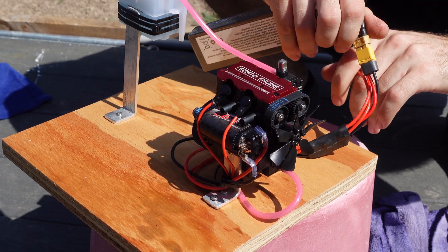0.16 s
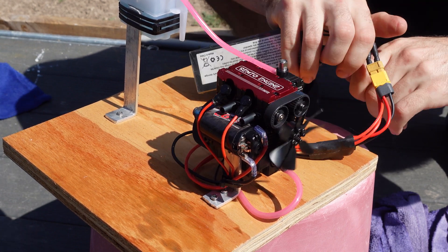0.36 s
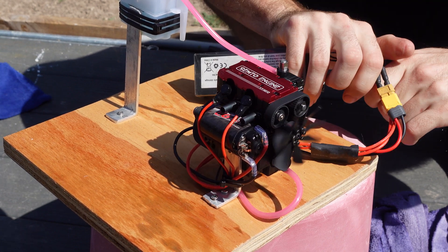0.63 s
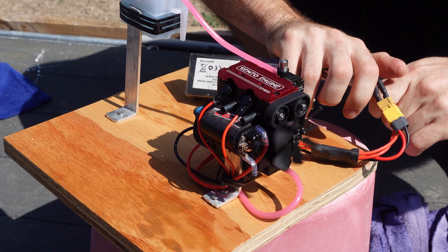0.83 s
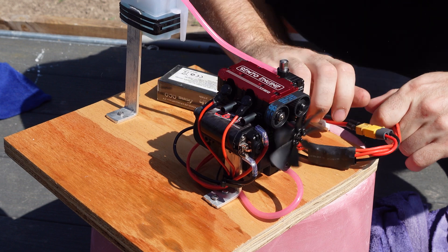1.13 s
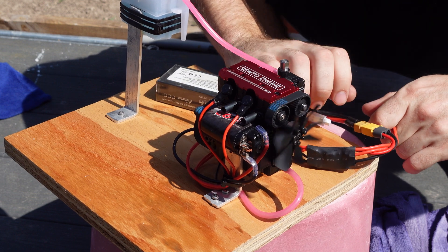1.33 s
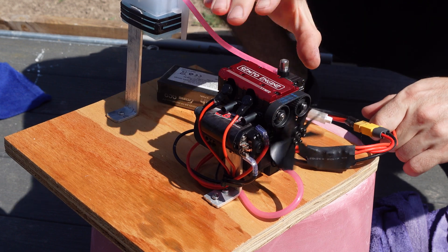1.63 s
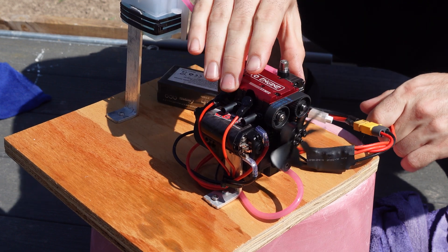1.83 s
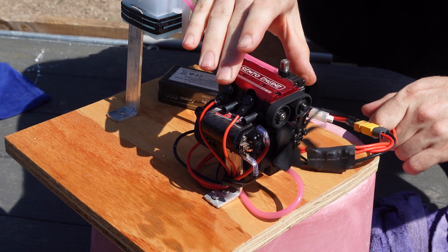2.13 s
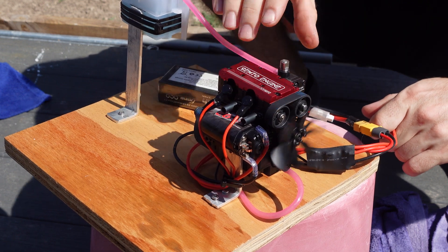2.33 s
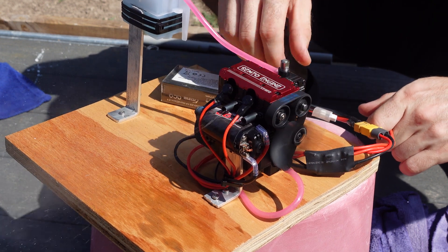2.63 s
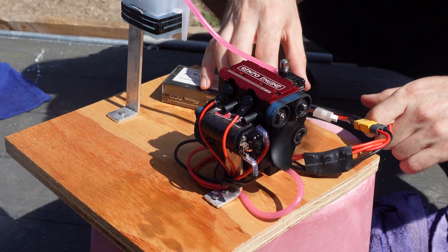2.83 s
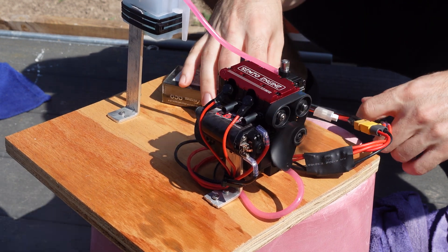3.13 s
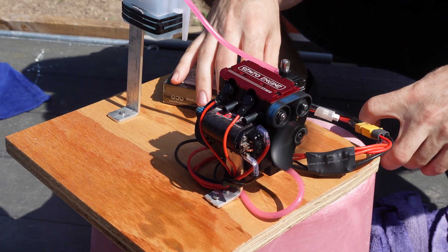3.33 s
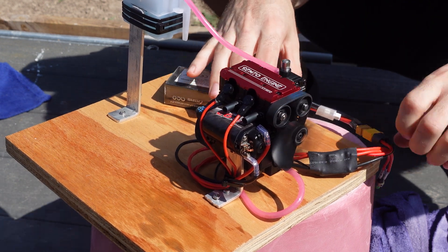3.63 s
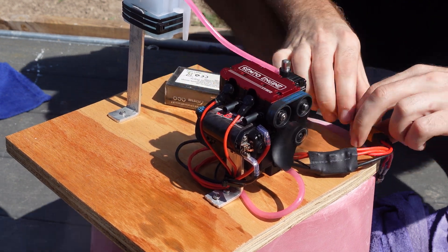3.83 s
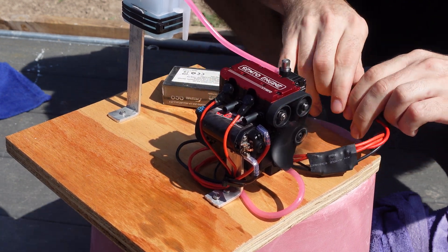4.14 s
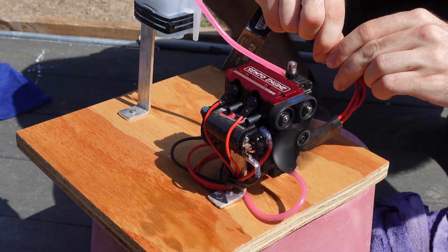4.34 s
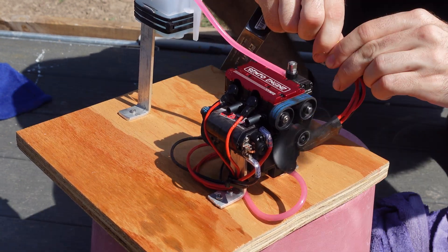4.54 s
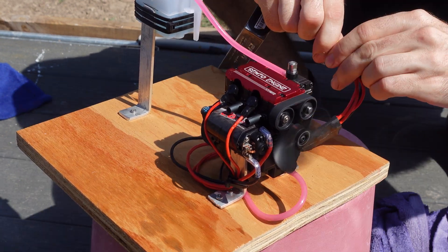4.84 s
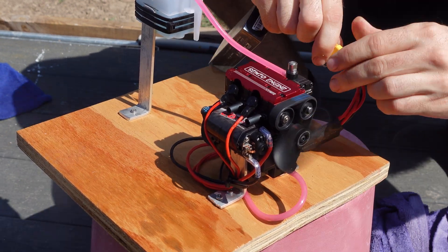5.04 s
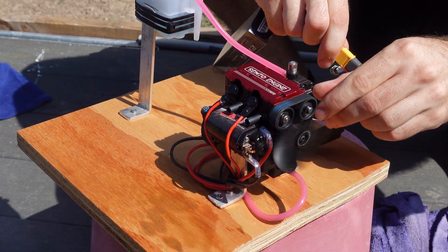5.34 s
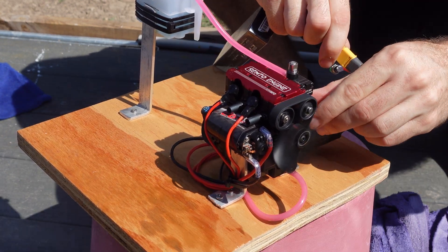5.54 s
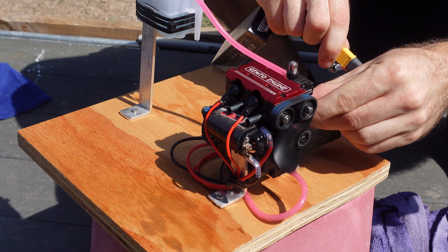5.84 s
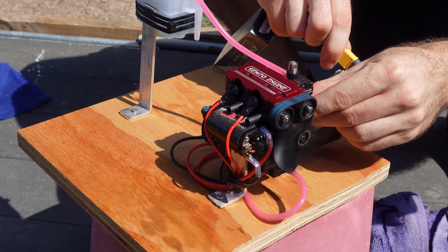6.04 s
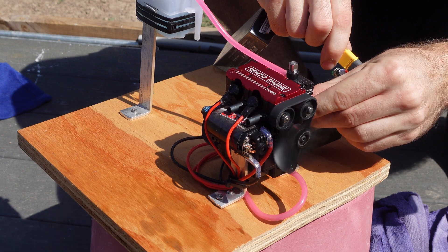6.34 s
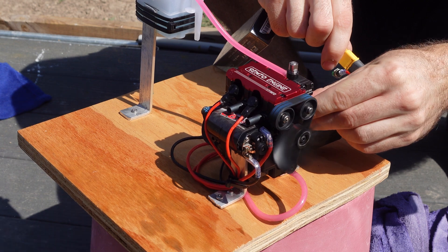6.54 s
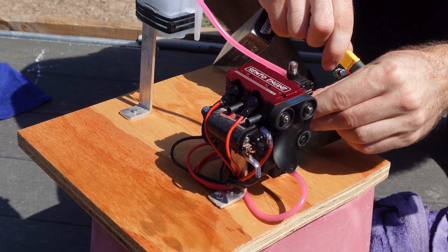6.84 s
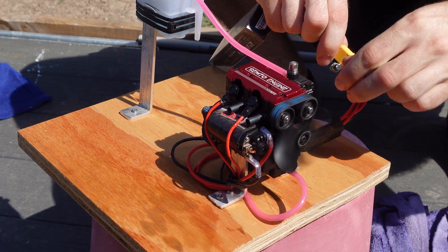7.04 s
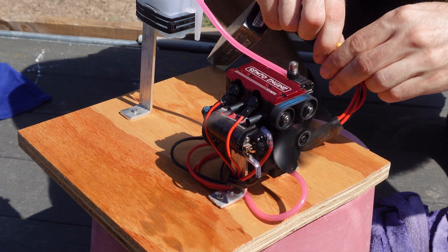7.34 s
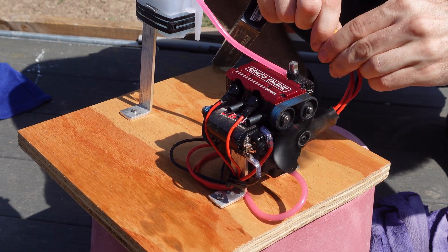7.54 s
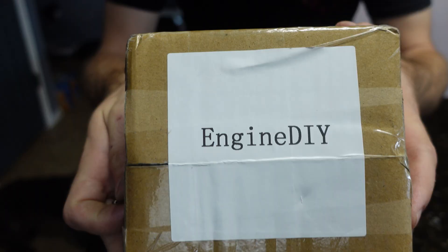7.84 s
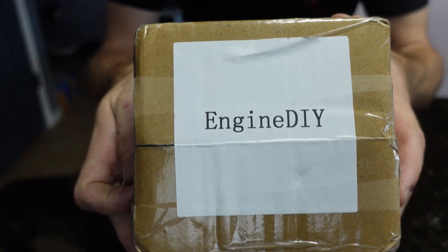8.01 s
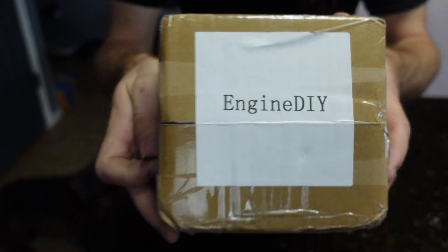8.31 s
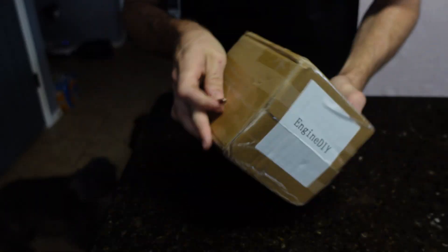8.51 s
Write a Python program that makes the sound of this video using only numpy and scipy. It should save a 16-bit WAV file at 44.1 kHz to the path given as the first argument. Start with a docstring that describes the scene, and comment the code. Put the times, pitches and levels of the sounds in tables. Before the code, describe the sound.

Outdoors, close up, an electric starter gives a short screech at about 0.4 seconds and cranks a small two-cylinder model engine. Its rapid, even clacking comes with a belt rasp, a gear whirr and the shudder of a plywood board. From 1.9 seconds the engine coughs and spits, and the starter slips with a second screech at 2.3. At 2.5 seconds the engine catches and runs loudly and raggedly, a buzz of fast exhaust pops with metallic valve clatter, hiss and a thin, very high whine that sinks in pitch. Around 6.3 seconds it speeds up to a higher, more even note as the whine fades. At 7.9 seconds the sound cuts abruptly to a quiet room. Between 8.3 and 8.7 seconds, fingers softly tap a hollow cardboard box three times and slide briefly over its faintly crackling tape.

```python
"""Outdoors, close up: an electric starter screeches and cranks a two-cylinder four-stroke model engine,
each compression shaking its plywood board. The engine coughs, the starter slips with a second screech,
and at 2.5 s it catches: exhaust pops, valve clatter and a thin sinking whine. It runs raggedly on both
cylinders, then from 6.3 s evenly and faster, mostly on one. At 7.9 s the scene cuts to a quiet room
where fingers tap a hollow cardboard box and slide over its crackling tape."""
import sys
import numpy as np
from scipy import signal
from scipy.fft import rfft, irfft, next_fast_len
from scipy.io import wavfile
from scipy.ndimage import uniform_filter1d, minimum_filter1d, map_coordinates

SR = 44100
rng = np.random.default_rng(int(sys.argv[2]) if len(sys.argv) > 2 else 0)


def int16_out(signal):
    """Quantize to a 16-bit WAV file."""
    q = np.round(np.clip(np.atleast_2d(signal).T, -1, 1) * 32767)
    wavfile.write(sys.argv[1], SR, q.astype(np.int16))


N = 382347
T = np.arange(N) / SR
SIZE = next_fast_len(N + SR // 2, True)
HZ = np.fft.rfftfreq(SIZE, 1 / SR)
START_S, CATCH_S, CUT_S = 0.32, 2.53, 7.897  # cues: starter on, engine catches, cut to the room
IDLE_HZ, REV_HZ = 58.5, 69.4  # cycle rates: ragged idle, fully revved tone

# engine speed in four-stroke cycles a second: t/s, f/Hz
CYCLE_RATE = [(2.55, 47.86), (2.68, 54.72), (2.8, 58.2), (2.86, 58.62), (3.28, 56.22), (3.46, 53.73),
              (3.52, 56.06), (3.72, 59.78), (4.42, 60.44), (4.54, 57.88), (4.69, 56.76), (4.75, 59.24),
              (5.09, 60.16), (5.29, 58.9), (5.38, 56), (5.55, 59.43), (6.01, 59.4), (6.12, 61.7),
              (6.16, 60.17), (6.31, 73.5), (6.42, 75.53), (6.61, 72.15), (6.8, 76.4), (7.07, 72.74),
              (7.73, 78.54), (7.89, 76.4)]
# faders of the running engine: t/s, exhaust level/dB, ping and valve level/dB, hiss level/dB
ENGINE_FADERS = [(2.6, -10, -29, -28.5), (2.61, -11.5, -26, -27.5), (3.38, -15, -27.5, -32.5),
                 (3.92, -12, -21.5, -29), (4.41, -13.5, -23.5, -31), (6.94, -14.5, -24, -31.5),
                 (7.01, -15.5, -27, -33), (7.81, -12.5, -25.5, -30), (7.88, -16, -29.5, -31.5)]
# combustion: t/s, second cylinder's strength/0-1, raggedness
COMBUSTION = [(2.5, 0.27, 5.5), (3.0, 0.66, 7), (4.5, 0.64, 4), (6.2, 0.23, 7), (6.32, 0.17, 2),
              (7.9, 0.13, 2)]
# EQ of an exhaust pop: f/Hz, level/dB
POP_EQ = [(35, -67), (75, -29.5), (125, -12.5), (175, 0), (230, -4.5), (300, 0), (370, -6), (445, 12),
          (530, 6), (620, 4.5), (730, 4), (860, -2), (1000, -3), (1300, -13), (1800, -28), (4000, -47.5)]
# extra EQ on the pops when revved: f/Hz, level/dB
REV_EQ = [(300, -0.5), (450, -3.5), (545, 3), (610, -2.5), (720, 4), (810, 1.5), (920, 8), (1150, -5.5),
          (2000, -9.5)]
# EQ of the rough exhaust gas: f/Hz, level/dB
GAS_EQ = [(40, -42), (110, -30.5), (190, -8.5), (250, 1), (340, -12.5), (445, 4), (560, -10.5), (700, 1),
          (830, -7), (1000, -6.5), (1700, -24.5), (4000, -42.5)]
# ring of the stand, rocked by the crank: f/Hz, width/Hz, level/dB
STAND_MODES = [(75, 20, -27), (179, 15.4, -10), (264.7, 17.45, 5.5), (283.6, 26.1, 6.5), (430, 31, -8),
               (666, 29, -7.5)]
# ring of the exhaust port: f/Hz, width/Hz, level/dB
PORT_MODES = [(2714, 410, -5), (3086, 285, 2.5), (3550, 440, -11)]
# ring of the metal under the valve gear: f/Hz, width/Hz, level/dB
METAL_MODES = [(1383, 33, 4.5), (2048, 82, 6.5), (2690, 130, 8.5), (3260, 236, 8), (4355, 145.9, 0.5),
               (5660, 570, -4)]
# EQ of hissing gas: f/Hz, level/dB
HISS_EQ = [(900, -9), (1700, -9), (3000, 3), (4300, 0.5), (5300, -5), (6600, -1.5), (8300, -5.5),
           (10000, -10), (13000, -13.5), (15800, -17.5)]
# the whine before its drop: t/s, f/Hz, level/dB
WHINE_GLIDE = [(0.6, 9800, -55), (2.5, 9630, -37), (2.65, 9050, -24), (2.83, 8704, -19.5), (3.1, 8420, -20),
               (3.42, 8348, -19), (3.8, 8075, -23.5), (4.24, 7886, -25)]
# first firings: t/s, level/dB, offset for spit and thud/dB
COUGH_CUES = [(1.911, -16, -20), (1.967, -6, -22), (2.014, -8, -24), (2.031, -4, -18.5), (2.077, -4, -32),
              (2.097, -7, -22), (2.143, -7.5, -26), (2.224, -9, -9.5), (2.357, -6, -11), (2.392, -3, -7),
              (2.444, 1, -5), (2.479, -7.5, -9), (2.536, -14, -2), (2.561, 3.5, -9)]
# cranking, briefly quicker as firings help: t/s, stroke rate/Hz, board level/dB, belt level/dB
CRANK_CURVES = [(0.45, 14.79, -12, -29.5), (1.2, 14.79, -11, -26.5), (1.7, 14.79, -11.5, -26),
                (1.87, 14.79, -15, -28.5), (1.92, 18.5, -19, -32.5), (2.22, 18.5, -16, -30.5),
                (2.36, 15, -10.5, -24.5), (2.65, 15, -10, -21.5)]
# ring of engine and board while cranking: f/Hz, width/Hz, level/dB
BOARD_MODES = [(215.6, 37, -8), (262, 32, -5), (337, 18.4, 1), (450, 28, -3.5), (706.5, 27.3, 3),
               (930, 40, -5), (1047, 59, -9)]
# EQ of the belt's rasp: f/Hz, level/dB
BELT_EQ = [(900, -16.5), (1200, -6), (1700, -17.5), (2150, -9.5), (2400, -5), (2850, -3), (3700, -6),
           (7300, -14), (8400, -14), (10500, -20.5), (15800, -26)]
# the belt pulley sings out: t/s, level/dB
PULLEY_SWELLS = [(0.47, -32.5), (1.21, -26), (1.35, -33), (1.55, -30), (1.75, -32), (2.301, -20.5),
                 (2.45, -23.5), (2.62, -22)]
# starter screeches: t/s, length/s, first f/Hz, held f/Hz, squeal attack/s,
# squeal level before EQ/dB, bite level/dB, grind level/dB, roughness/0-1
SCREECH_CUES = [(0.365, 0.075, 1415, 958, 0.0053, -18, -10, -25, 0.11),
                (2.251, 0.088, 1310, 1177, 0.037, -13.5, -6, -20.5, 0.01)]
# partials of the squeal: harmonic number, level/dB
SQUEAL_PARTIALS = [(1, 1), (2, 1), (3, 1.5), (4, 2.5), (5, -2.5), (6, -10.5), (7, -13), (8, -24)]
# the mount ringing along with the squeal: f/Hz, level/dB
MOUNT_EQ = [(600, 1), (950, 16), (1150, 2), (1400, -1.5)]
# EQ of the starter's grinding: f/Hz, level/dB
GRIND_EQ = [(350, -50), (600, -7), (1700, -5.5), (1970, -16), (2590, -9), (4310, -3.5), (5210, -11.5),
            (6060, -5), (15800, -19)]
# fader of the starter's gear whirr: t/s, level/dB
WHIRR_FADER = [(1.0, -57), (1.5, -35), (1.8, -41.5), (1.9, -28), (2.22, -30), (2.3, -49)]
# finger taps: t/s, knock level/dB, offset for crackle/dB
TAP_CUES = [(8.324, -32.5, -16), (8.481, -31, -24), (8.664, -30, -8)]
# hand slides: t/s, length/s, rub level/dB, tape level/dB
SLIDE_CUES = [(8.466, 0.062, -41.5, -38), (8.648, 0.05, -37, -39)]
# EQ of the hollow box: f/Hz, level/dB
BOX_EQ = [(41, -44.5), (70, -17), (112, -7), (469, -3), (623, -6), (1190, -2.5), (1300, -10), (1500, -10.5),
          (3000, -29), (3900, -49), (6600, -120)]
# EQ of the crackling tape: f/Hz, level/dB
TAPE_EQ = [(1290, -59.5), (2200, -41), (3610, -18), (4080, -18), (4440, -13.5), (4620, -18), (5780, -25),
           (7970, -25), (15800, -44.5)]
# EQ of the outdoor ambience: f/Hz, level/dB
YARD_EQ = [(15, -49), (25, -63.5), (137, -0.5), (170, -5.5), (382, -9.5), (437, -8.5), (881, -13.5),
           (1010, -10.5), (1980, -28), (8050, -33.5), (15800, -43.5)]
# EQ of the room tone: f/Hz, level/dB
ROOM_EQ = [(15, -51.5), (25, -30), (55, -20), (86, -8), (110, -11), (205, -0.5), (333, -5.5), (403, -2),
           (710, -6), (955, -7), (1360, -15.5), (8050, -35.5), (15800, -46)]


def engine(hunting=0.0011):
    """One cycle count clocks every engine layer; ragged firing makes the speed hunt."""
    speed, = curves(CYCLE_RATE)
    _, ragged = curves(COMBUSTION)
    cycle = np.cumsum(speed * (1 + hunting * ragged * wobble(25))) / SR
    times, sizes = firings(cycle)
    body = exhaust(cycle, times, sizes) * gate(2.3, CUT_S, rise=0.49)
    top = clatter(cycle, times, sizes) * gate(CATCH_S, CUT_S, rise=0.038)
    return body + top + whine(cycle)


def firings(cycle, lag_cycles=0.275, flip_chance=0.1):
    """Times and strengths of the firings, the second cylinder trailing the first."""
    second_strength, raggedness = curves(COMBUSTION)
    first, second = cycle_times(cycle, 0), cycle_times(cycle, lag_cycles)
    times = np.concatenate([first, second])
    sizes = np.concatenate([np.ones(len(first)), np.interp(second, T, second_strength)])
    ragged = np.interp(times, T, raggedness)
    # the limp: every other cycle burns weakly, and now and then the pattern flips
    weak = np.tile(np.cumsum(rng.random(len(first)) > flip_chance) % 2, 2)
    sizes *= amp(-1.58 * np.maximum(ragged - 1, 0) * weak)
    sizes *= amp(0.84 * ragged * np.minimum(rng.standard_normal(len(times)), 0.7))
    misfired = rng.random(len(times)) < 0.003 * ragged ** 2
    jitter_s = 4e-6 * ragged ** 2 * rng.standard_normal(len(times))
    return times + jitter_s, sizes * np.where(misfired, 0.25, 1)


def exhaust(cycle, times, sizes, pop_db=-1.5, gas_db=-14, stand_db=-6.5):
    """Firings pop from the pipe over a rush of gas; the crank rocks the stand in strict time."""
    revved = np.clip((curves(CYCLE_RATE)[0] - IDLE_HZ) / (REV_HZ - IDLE_HZ), 0, 1)
    intakes = cycle_times(cycle, 0.475)
    puffs = pulses(times, sizes) + pulses(intakes, np.full(len(intakes), 0.3))
    puffs = puffs * (1 - revved) + filtered(puffs * revved, eq(REV_EQ))
    pops = -steady(filtered(puffs, eq(POP_EQ)), 0.087)
    gas = noise(eq(GAS_EQ)) * (0.5 + 0.5 * curves(COMBUSTION)[1])  # louder when ragged
    beats = cycle_times(cycle, 0)
    shoves = pulses(beats, np.ones(len(beats)))
    rocking = -steady(filtered(shoves, resonances(STAND_MODES)), 0.101)
    fader = amp(curves(ENGINE_FADERS)[0])
    return fader * (amp(pop_db) * pops + amp(gas_db) * gas + amp(stand_db) * rocking)


def clatter(cycle, times, sizes, lead_s=0.00065):
    """Blow-down pings the port ahead of each pop, valves tap the metal, and gas hisses with both."""
    _, ring_db, hiss_db = curves(ENGINE_FADERS)
    speed, = curves(CYCLE_RATE)
    _, ragged = curves(COMBUSTION)

    def scatter(at):
        """Random gain per hit, wider when ragged."""
        return amp(0.5 * np.interp(at, T, ragged) * rng.standard_normal(len(at)))

    intakes = cycle_times(cycle, 0.5)
    suction = 0.41 * (np.interp(intakes, T, speed) / REV_HZ) ** 4  # the intake pings too, at speed
    puffs = pulses(times - lead_s, sizes * scatter(times))
    puffs += pulses(intakes - lead_s, suction * scatter(intakes))
    ping = steady(filtered(puffs, resonances(PORT_MODES)), 0.041)
    taps = np.concatenate([cycle_times(cycle, part) for part in (0.24, 0.44, 0.72, 0.95)])
    force = np.repeat([0.65, 0.8, 0.2332, 0.37], len(intakes)) * scatter(taps)
    metal = steady(filtered(pulses(taps, force), resonances(METAL_MODES)), 0.088)
    metal *= (speed / IDLE_HZ) ** 3.2  # valves hit harder with speed
    flow = 0.5 + 3.4 * bursts(taps, force, t60=0.017) + 0.66 * bursts(times - lead_s, sizes, t60=0.041)
    hiss = steady(noise(eq(HISS_EQ)) * flow, 0.14) * amp(5 + 0.61 * ragged)
    casing = noise(resonances([(8700, 70, -12), (9130, 120, 0)]))
    return amp(ring_db) * (amp(-1.8) * ping + amp(-7) * metal) + amp(hiss_db) * (hiss + amp(-5) * casing)


def whine(cycle, drop_s=4.257, flutter_hz=12):
    """A thin tone that glides down, drops a step, then sinks and fades as the engine speeds up."""
    over_idle = curves(CYCLE_RATE)[0] - IDLE_HZ
    dropped = [7410 - 16.8 * over_idle, -21.5 - 0.5 * over_idle]
    hz, db = np.where(T < drop_s, curves(WHINE_GLIDE), dropped)
    shake = 8 * np.pi * cycle  # twice per turn of the crank
    phase = 2 * np.pi * np.cumsum(hz + flutter_hz * wobble(160)) / SR + 0.32 * np.sin(shake)
    tone = np.sqrt(2) * np.sin(phase) * (1 + 0.16 * np.cos(shake))
    return tone * amp(db + wobble(60)) * gate(WHINE_GLIDE[0][0], CUT_S, rise=0.3)


def coughs():
    """Stray firings as the engine tries to catch: a pop, a thud into the board and a spit of gas."""
    times, db, offset_db = np.transpose(COUGH_CUES)
    pipe = eq(POP_EQ)
    pops = filtered(pulses(times, -amp(db - 1)), pipe) / np.abs(irfft(pipe, SIZE)).max()
    boom = steady(noise(resonances([(225, 51, 0)]) ** 2), 0.039)
    thud = boom * bursts(times, amp(db + offset_db - 1), t60=0.13)
    spit = noise(eq(HISS_EQ)) * bursts(times, amp(db + offset_db + 3), t60=0.029)
    return pops + thud + spit


def cranking(first_stroke_s=0.3376, spin_up_s=0.095, load_lag_s=0.0071, knocks_per_s=1100):
    """Each compression clacks, loads the belt and its singing pulley, and shudders through the board."""
    rate, board_db, belt_db = curves(CRANK_CURVES)
    count = np.cumsum(rate * (T > first_stroke_s)) / SR
    last_stroke = int(np.interp(CRANK_CURVES[-1][0], T, count))
    strokes = np.interp(np.arange(last_stroke + 1), count, T)
    load_sizes, clack_sizes = amp(1.1 * rng.standard_normal((len(strokes), 2))).T
    load = sum(size * swell(at + load_lag_s, 0.0145) for at, size in zip(strokes, load_sizes))
    pull = np.clip((T - START_S) / spin_up_s, 0.3, 1)
    slipping = gate(2.24, 2.335, rise=0.041, fall=0.0033)  # the shudder ducks as the starter slips
    knocks = rng.standard_normal(N) * (rng.random(N) < knocks_per_s / SR)
    wood = resonances(BOARD_MODES) * eq([(50, -3), (180, 1), (1100, -7), (1600, -7), (4000, -32.5)])
    shudder = amp(board_db - 7 * (1 - pull) - 12 * slipping) * np.hypot(load, amp(-7))
    board = steady(filtered(knocks, wood), 0.033) * shudder
    rasp = amp(1.5 + 3.5 * wobble(220)) * (0.68 + 0.15 * load)
    clack = amp(11) * bursts(strokes, clack_sizes, t60=0.016)
    belt = noise(eq(BELT_EQ)) * amp(belt_db) * np.hypot(rasp, clack)
    singing = amp(-36) * (rate.min() / rate) ** 3
    singing += sum(amp(db) * swell(at, 0.035) for at, db in PULLEY_SWELLS)
    ring = steady(noise(resonances([(8780, 25, -7), (8890, 38, -7)])), 0.061)
    pulley = ring * singing * (0.19 + 1.2 * load)
    return (board + (belt + pulley * pull) * pull) * gate(START_S, 2.715, fall=0.29)


def screech(cue, bite_s=0.012, grip_s=0.018, sag_hz_per_s=750):
    """The starter slips: a grinding bite, then a squeal that rings the mount and dives as it grips."""
    start, length, first_hz, held_hz, attack_s, squeal_db, bite_db, grind_db, rough = cue
    t = np.clip(T - start, 0, length)
    bite = np.exp(-(t / bite_s) ** 2)
    grip = np.clip(1 - (length - t) / grip_s, 0, 1)
    hz = (held_hz + (first_hz - held_hz) * bite - sag_hz_per_s * t) * (1 - 0.19 * grip)
    jitter = (rough + 0.1 * (bite + grip / 2)) * wobble(600)
    phase = 2 * np.pi * np.cumsum(hz * (1 + jitter)) / SR
    tone = unit(sum(amp(db) * np.sin(k * phase + rng.uniform(0, 2 * np.pi)) for k, db in SQUEAL_PARTIALS))
    squeal = filtered(tone, eq(MOUNT_EQ)) * amp(squeal_db) * np.minimum(t / attack_s, 1) * (1 - grip / 2)
    grinding = noise(eq(GRIND_EQ)) * np.hypot(amp(bite_db) * bite, amp(grind_db))
    return (squeal + grinding) * gate(start, start + length, fall=0.0057)


def whirr(throb_hz=48, depth=0.39):
    """The starter's gears whirr and throb as it spins more freely."""
    level_db, = curves(WHIRR_FADER)
    throb = 1 + depth * np.sin(2 * np.pi * throb_hz * T)
    ring = noise(resonances([(550, 63, -0.5), (2335, 52, 0.5), (2850, 530, -9)]))
    return ring * throb * amp(level_db) * gate(WHIRR_FADER[0][0], WHIRR_FADER[-1][0])


def box(attack_s=0.027, release_t60=0.49, handling_db=-49):
    """Fingers knock and rub the hollow box and slide over its crackling tape."""
    times, db, offset_db = np.transpose(TAP_CUES)
    hollow = bursts(times, amp(db - 2), t60=0.036) + amp(handling_db) * (T > SLIDE_CUES[0][0])
    crackle = bursts(times, amp(db + offset_db - 5), t60=0.027)
    for start, length, rub_db, tape_db in SLIDE_CUES:
        release = amp(-60 * np.maximum(T - start - length, 0) / release_t60)
        slide = np.clip((T - start) / attack_s, 0, 1) * release
        hollow += amp(rub_db) * slide
        crackle += amp(tape_db + 1.7 * wobble(770)) * slide
    return hollow * noise(eq(BOX_EQ)) + crackle * noise(eq(TAPE_EQ))


def ambience(yard_db=-50.5, room_db=-45):
    """A faint outdoor bed, hard cut to murky room tone."""
    return np.where(T < CUT_S, amp(yard_db) * noise(eq(YARD_EQ)), amp(room_db) * noise(eq(ROOM_EQ)))


def cycle_times(cycle, part):
    """When each engine cycle is this part of the way through."""
    return np.interp(np.arange(1, int(cycle[-1]) - 1) + part, cycle, T)


def amp(db):
    """Decibels to gain."""
    return 10 ** (np.asarray(db) / 20)


def unit(x):
    """Scale to rms 1."""
    return x / np.sqrt(np.mean(x ** 2) + 1e-20)


def steady(x, seconds):
    """Ride the gain to hold the running rms near 1."""
    width = max(int(seconds * SR), 2)
    power = np.abs(uniform_filter1d(uniform_filter1d(x ** 2, width), width))
    return x / np.sqrt(power + np.mean(x ** 2) / 10 ** 4)


def curves(rows):
    """An automation curve for each column after the time."""
    times, *columns = np.transpose(rows)
    return [np.interp(T, times, column) for column in columns]


def gate(t0, t1, rise=0.0024, fall=0.00119):
    """Fades in from t0 and is shut at t1; all in seconds."""
    return np.clip((T - t0) / rise, 0, 1) * np.clip((t1 - T) / fall, 0, 1)


def swell(at, half_width_s):
    """A bell-shaped envelope."""
    return np.exp(-0.5 * ((T - at) / half_width_s) ** 2)


def bursts(times, sizes, t60):
    """An envelope that jumps at each time and falls 60 dB in t60 seconds."""
    kicks = np.bincount(np.clip(np.asarray(times) * SR, 0, N).astype(int), sizes, N + 1)[:N]
    return signal.lfilter([1], [1, -amp(-60 / (t60 * SR))], kicks)


def wobble(rate):
    """Smooth random modulation, rate knots a second."""
    return map_coordinates(rng.standard_normal(int(N * rate / SR) + 4), [T * rate])


def eq(points):
    """Minimum-phase response through (Hz, dB) points."""
    hz, db = np.transpose(points)
    gain = amp(np.interp(np.log(HZ + 1), np.log(hz + 1), db))
    cepstrum = irfft(np.log(gain + 1e-6), SIZE)
    cepstrum[1:SIZE // 2] *= 2
    cepstrum[SIZE // 2 + 1:] = 0
    return np.exp(rfft(cepstrum))


def resonances(modes):
    """Response of a bank of (Hz, width, dB) resonators, alternating in polarity."""
    return sum((-1) ** k * amp(db) * 1j * HZ * width / (hz * hz - HZ ** 2 + 1j * HZ * width)
               for k, (hz, width, db) in enumerate(modes))


def filtered(x, response):
    """x through a frequency response."""
    return irfft(rfft(x, SIZE) * response, SIZE)[:N]


def noise(response):
    """Coloured noise of rms 1."""
    return unit(filtered(rng.standard_normal(N), response))


def pulses(times, sizes):
    """Clicks placed between samples as windowed sincs."""
    at = np.asarray(times)[:, None] * SR
    taps = np.floor(at) + np.arange(-7, 9)
    clicks = np.sinc(taps - at) * np.cos(np.pi * (taps - at) / 16) ** 2 * np.asarray(sizes)[:, None]
    return np.bincount(np.clip(taps, 0, N).astype(int).ravel(), clicks.ravel(), N + 1)[:N]


def scene():
    """Mono mix of starter, engine, box and ambience."""
    starter = cranking() + whirr() + sum(screech(cue) for cue in SCREECH_CUES)
    return (starter + coughs() + engine() + box() + ambience())[None]


def record(dry, ceiling=0.7, high_cut_hz=15830):
    """A fast peak limiter, then a brick-wall high cut."""
    needed = np.minimum(1, ceiling / (np.abs(dry[0]) + 1e-9))
    gain = uniform_filter1d(minimum_filter1d(needed, size=130), size=130)
    return filtered(dry[0] * gain, HZ < high_cut_hz)[None]


dry = scene()
out = record(dry)
int16_out(out)
```